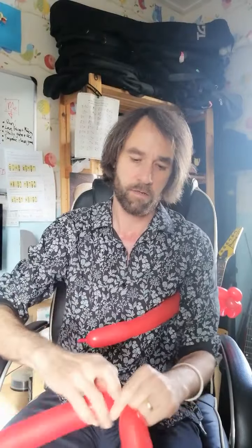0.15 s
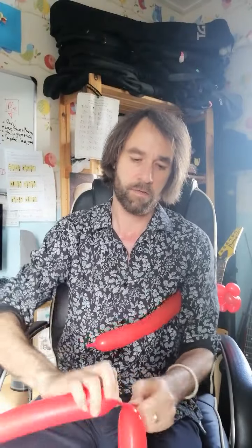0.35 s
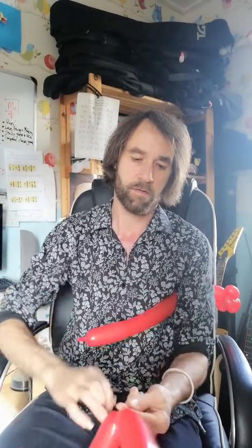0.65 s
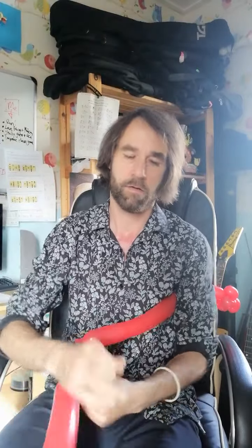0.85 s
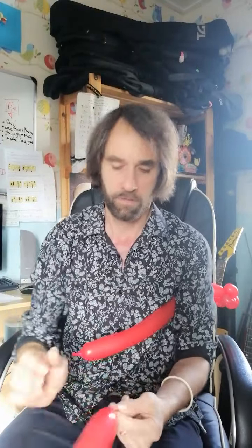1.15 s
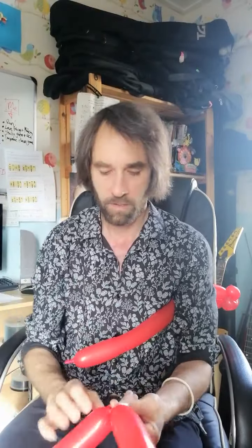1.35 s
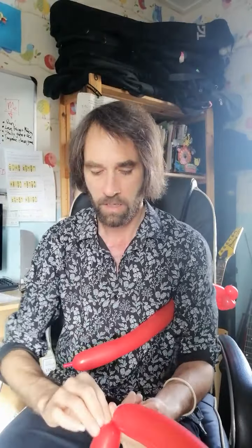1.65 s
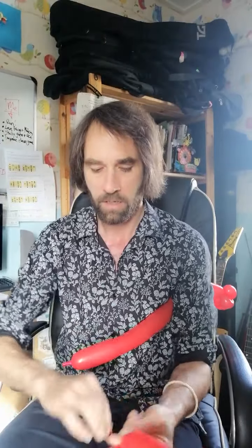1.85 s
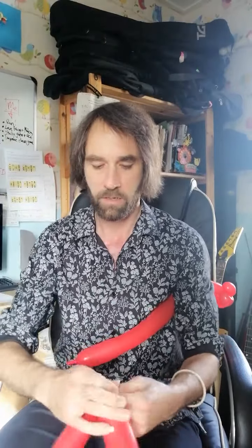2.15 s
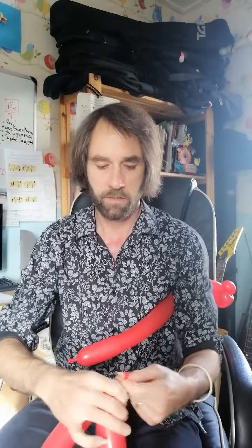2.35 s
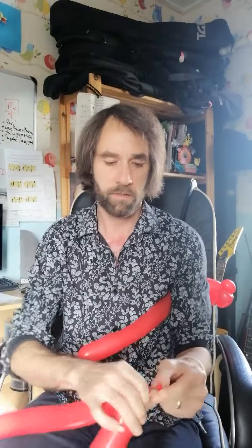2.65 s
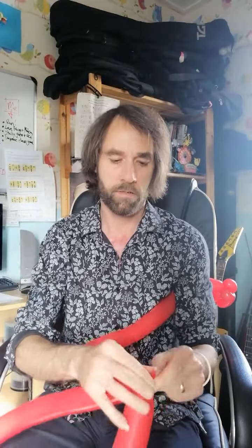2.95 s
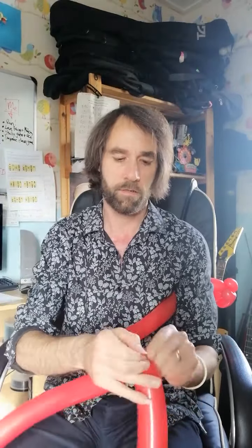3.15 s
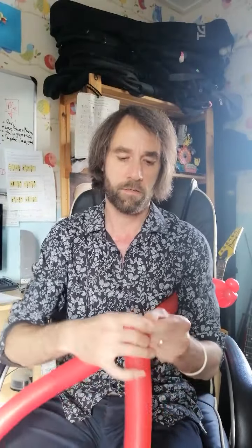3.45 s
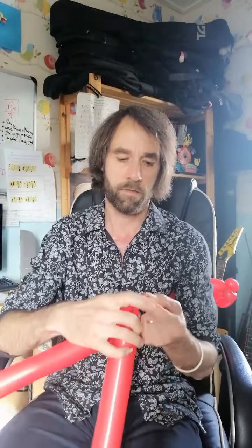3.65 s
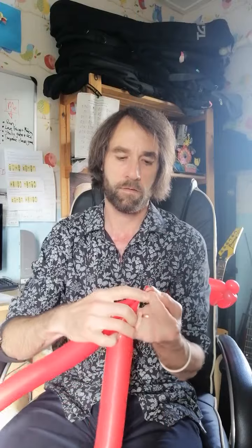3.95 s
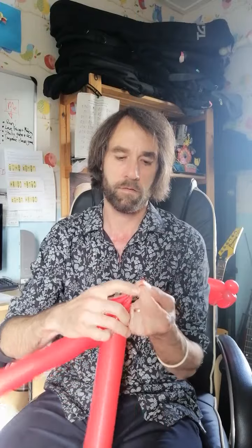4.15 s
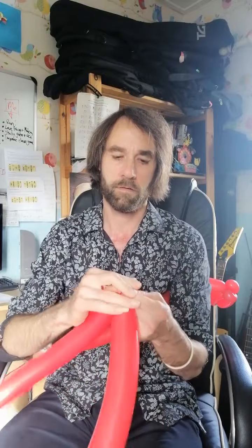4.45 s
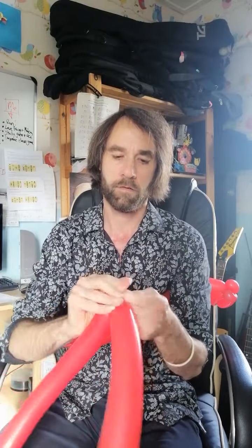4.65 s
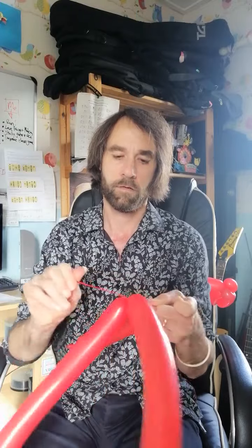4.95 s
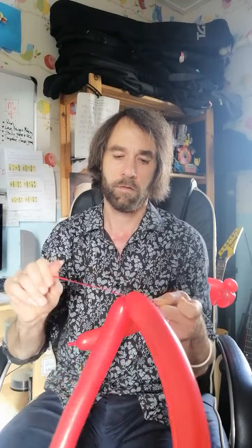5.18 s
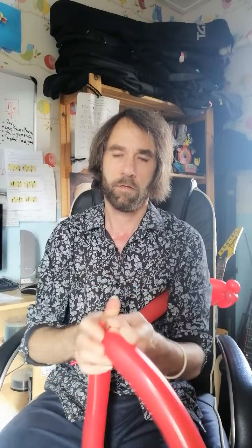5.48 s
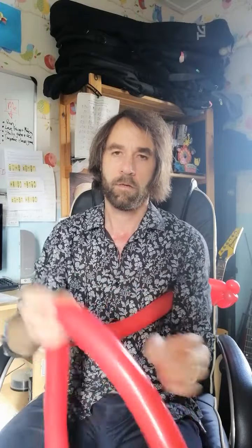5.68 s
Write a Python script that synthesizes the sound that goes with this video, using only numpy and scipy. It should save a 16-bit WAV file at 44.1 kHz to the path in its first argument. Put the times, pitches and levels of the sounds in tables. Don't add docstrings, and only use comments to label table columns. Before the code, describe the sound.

Sticky rubber catches and releases in irregular clicks, short crackling scrapes and very brief squeaks. Low tube thumps sit beneath some of them. Activity is dense at first, sparse from about 1.3 to 2.2 seconds, then lively again, ending with light touches. Close, dry, narrow-band mono sound with a short room tail and faint hush.

```python
import sys
import numpy as np
from scipy import signal
from scipy.fft import rfft, irfft
from scipy.io import wavfile
from scipy.ndimage import uniform_filter1d

SR = 44100
rng = np.random.default_rng(int(sys.argv[2]) if len(sys.argv) > 2 else 0)


def level_to_linear(level):
    exponent = np.asarray(level, float) / 20
    return 10 ** exponent


def persist_wave(psi):
    counts = np.round(np.clip(psi, -1, 1) * 32767).astype(np.int16)
    wavfile.write(sys.argv[1], SR, np.atleast_2d(counts).T)


N = 256662


def band(x, hz, width):
    return signal.lfilter(*signal.iirpeak(np.clip(hz, 20, 9000), hz / width, fs=SR), x)


def cut(x, lo_hz, hi_hz):
    return signal.sosfilt(signal.butter(2, [lo_hz, hi_hz], "band", fs=SR, output="sos"), x)


def peak(x, db):
    return x * level_to_linear(db) / np.sqrt(uniform_filter1d(x ** 2, size=176).max())


def unit(x):
    return x / np.sqrt(np.mean(x ** 2))


def add(out, x, s):
    i = int(s * SR)
    out[i:i + len(x)] += x[:len(out) - i]


def slips(size, per_s, spread_db):
    boost_db = np.minimum(spread_db * rng.exponential(size=size), 8)
    return (rng.random(size) < per_s / SR) * rng.standard_normal(size) * level_to_linear(boost_db)


def flurry(first):
    fade_ms = 8.5
    clicks = slips(4000, 2400, 4.0) * np.exp(-np.arange(4000) / SR * 1000 / fade_ms)
    clicks[0] = first
    return clicks


def skin(clicks, hz, width):
    return band(band(clicks, hz, width * hz), hz, 3.2 * hz)


def crack(clicks):
    return cut(cut(clicks, 3800, 7000), 3200, 8000)


def snaps():
    # start in seconds, level in dB, ring in Hz,
    # crack in dB against the ring.
    pops = [(.024, -16, 1200, -15), (0.264, -29, 716, -16.5), (.281, -46, 614, -2), (0.333, -25, 1320, -35),
            (.429, -19, 1700, -3.5), (.618, -28, 738, -2), (.737, -14, 1184, -31.5),
            (.89, -26.5, 1850, -38), (.937, -17.5, 560, -8), (1.096, -28, 950, -8), (1.122, -39, 970, 2),
            (1.191, -27, 980, -7.5), (1.37, -47, 1090, -7), (1.431, -48.5, 760, -38),
            (1.914, -34.5, 780, -49), (2.151, -49.5, 930, -7.5), (2.371, -39.5, 940, 2),
            (2.459, -38.5, 714, -17), (2.578, -64, 1780, 11), (2.721, -9, 813, -16.5),
            (2.728, -15, 1115, -25), (2.818, -47, 960, 4.5), (2.952, -34, 1320, -4.5),
            (3.184, -30.5, 1717, -5.5), (3.541, -10, 1700, -29), (3.548, -11, 1440, -7),
            (3.725, -28.5, 1420, -21), (4.643, -35.5, 1500, -10), (4.812, -28.5, 1100, -8.5),
            (5.693, -36, 821, -18)]
    # start in seconds, level in dB, ring in Hz, crack in dB against the ring.
    snicks = [(0.656, -39.5, 2390, -1.5), (0.7, -18, 2660, -13), (0.786, -29.5, 3540, -20),
              (.619, -25, 3600, -12.5), (1.48, -32.5, 3480, -33), (1.611, -46, 3100, -29),
              (1.702, -26.5, 3840, -35), (1.727, -50, 3300, 8), (1.974, -42, 2620, -24),
              (2.001, -26, 2480, 0.5), (2.236, -30, 2160, -12), (2.267, -26, 2460, 0),
              (2.354, -24, 2400, -5), (2.869, -22, 2190, -3.5), (3.011, -20, 2160, 0.2),
              (3.155, -12.5, 2240, -18), (3.839, -33.5, 2770, -1.5), (3.872, -28, 2150, -26),
              (4.077, -51, 2910, 0.5), (4.174, -40, 2480, -2), (4.187, -11.5, 2546, -11.5),
              (4.33, -35.5, 2350, -0.5), (4.444, -20, 2190, -46), (4.453, -21.5, 2120, -22),
              (4.549, -13, 2560, -9), (4.873, -22.5, 2320, -3), (4.984, -10.5, 2280, -13),
              (5.545, -55.5, 2130, 1.5), (5.584, -31.5, 2660, -6), (5.612, -22.5, 1960, -3)]
    tear, ring_width = 3.6, 0.35
    rows = []
    for s, db, hz, c in pops:
        rows.append((s, db, hz, db + 0.5 + 0.69 * c, 2250, db + c))
    for s, db, hz, c in snicks:
        slack_db = db - 8 - 2 * (hz / 1000 - 2.5)
        rows.append((s, slack_db, hz * 0.38, db, hz, db + c))
    out = np.zeros(N)
    for s, low_db, low_hz, high_db, high_hz, crack_db in rows:
        low = peak(skin(flurry(tear), low_hz, ring_width), low_db)
        high = peak(skin(flurry(-tear), high_hz, ring_width), high_db)
        add(out, low + high + peak(crack(flurry(tear)), crack_db), s)
    return out


def knocks():
    # start in seconds, peak in dB, air ring in Hz, bass in dB against the ring.
    firm = [(.023, -32, 415, 0), (0.26, -38.5, 308, 4.5), (0.442, -29, 458, -10), (.616, -30, 387, -7),
            (0.736, -16, 387, -6.5), (.797, -35, 440, 0), (.937, -17.5, 366, -10.5), (.949, -25, 365, -50),
            (1.095, -29, 380, -3.5), (1.197, -26, 206, 4.2), (1.219, -29.5, 405, 0),
            (2.236, -33.5, 430, -6.5), (2.385, -36.5, 351, -2), (2.723, -32, 382, -18.5),
            (2.867, -25.5, 490, -13), (2.933, -35, 355, -19.5), (3.009, -40.5, 462, -6.5),
            (3.153, -21, 368, -16.5), (3.197, -27.5, 336, -6.5), (3.295, -29, 296, 1.5),
            (3.541, -29, 389, -11), (3.567, -28, 340, -6.5), (3.93, -27.5, 336, -0.5), (4.365, -32, 350, 2),
            (4.42, -52.5, 229, -6), (4.548, -32.5, 366, -7.5), (4.642, -47, 571, -3.5),
            (4.982, -20, 512, -5), (5.585, -36, 290, -7), (5.808, -29.5, 324, -12)]
    # start in seconds, peak in dB,
    # bass in dB against the ring.
    taps = [(.238, -62, 16), (0.326, -42, -16), (0.402, -39.5, -2), (0.7, -37.5, -3), (1.039, -38, -21),
            (1.426, -52, -1.2), (1.479, -47.5, 1), (1.708, -48.5, -10), (1.912, -41, 4.5), (2.0, -37, -5.5),
            (2.15, -40.5, -8), (2.316, -56, -6), (2.457, -50.5, 10), (2.887, -32.5, -3), (3.476, -43, -28),
            (3.509, -42, -11), (3.649, -47.5, -4), (3.835, -54, -9.5), (3.869, -42.5, -5),
            (4.184, -41.5, -2.5), (4.327, -43, -2.5), (4.811, -43.5, -6.5), (4.87, -38.5, -5.5),
            (5.006, -31.5, -13), (5.564, -46, -12.5), (5.613, -42.5, -2), (5.657, -43, -4),
            (5.772, -50, -14)]
    tap_hz, push_ms, tear = 367, 12, 3.6
    out, t = np.zeros(N), np.arange(8000) / SR
    for s, db, hz, bass_db in list(firm) + [(s, db, tap_hz, bass) for s, db, bass in taps]:
        push = slips(len(t), 300, 16.0) * np.exp(-t * 1000 / push_ms)
        push[0] = tear
        ring = cut(cut(band(push, hz, 0.3 * hz), 150, 840), 72, 810)
        sway = cut(band(push, 145, 80), 47, 210)
        add(out, peak(ring, db) + peak(sway, db + bass_db), s)
    return out


def scrapes():
    # crest in seconds, level in dB, centre in Hz,
    # swell in ms, crack in dB.
    pulls = [(0.362, -37, 2520, 23, -31), (0.715, -30, 2360, 9.4, -17), (0.797, -34, 2550, 21, -28),
             (2.28, -36.5, 2310, 29, -22), (2.881, -22, 2150, 15, -22), (2.959, -32.5, 2500, 19, -34),
             (3.739, -36, 2720, 14, -19), (3.849, -43.5, 3540, 9.9, -21), (4.458, -54, 2240, 36, -2),
             (5.631, -38.5, 1730, 49, -10), (4.435, -45, 2100, 43, -23), (4.495, -53, 690, 12, -22.5)]
    # crest in seconds, level in dB, centre in Hz, fade in ms, crack in dB.
    slides = [(.039, -24, 1300, 8.4, -29.5), (0.062, -31, 3000, 17, -52.5), (.45, -27.5, 1670, 20, -45),
              (1.14, -46.5, 2000, 14, -15), (1.226, -35.5, 2100, 18, -11), (1.737, -42, 2500, 21, -28),
              (2.362, -33, 1900, 7, -17), (2.658, -66, 2800, 30, -5.5), (2.86, -38, 2570, 8.6, 1.5),
              (2.935, -30, 910, 5.1, -13), (3.17, -24, 2400, 13.1, -9), (3.203, -27, 2057, 32, -29.5),
              (3.263, -30, 1970, 23, -21.5), (3.489, -39.5, 2310, 9.6, -14.5),
              (3.517, -38.5, 2220, 8.3, -6), (3.562, -25.5, 1720, 16, -22), (4.09, -47, 3120, 15, -18.5),
              (4.351, -44.5, 2340, 24, -8.5), (5.77, -62.5, 2600, 13.8, 2)]
    rows = [(s, db, hz, ms, ms * 0.83, c) for s, db, hz, ms, c in pulls]
    rows += [(s, db, hz, ms * 0.97, ms, c) for s, db, hz, ms, c in slides]
    out, t = np.zeros(N), np.arange(-1500, 7000) / SR * 1000
    for s, db, hz, swell, fade, crack_db in rows:
        drag = np.where(t < 0, np.exp(-(t / max(swell, 2)) ** 2), np.exp(-t / max(fade, 2)))
        clicks = slips(len(t), 2300, 2.0) * drag
        add(out, peak(skin(clicks, hz, 0.82), db) + peak(crack(clicks), db + crack_db), s + t[0] / 1000)
    return out


def squeaks():
    # start in seconds, level in dB, click rate in Hz at the start, click rate in
    # Hz at the end, length in ms.
    trains = [
        (.3312, -24, 745, 676, 4),
        (1.7265, -32.5, 1660, 1630, 15),
        (1.75, -48.5, 1840, 1400, 26),
        (3.4795, -38, 410, 430, 11),
        (3.507, -28.5, 430, 430, 5.41),
        (1.049, -49, 3950, 3700, 7.9),
        (3.151, -21.5, 2257, 2066, 10.5),
        (3.17, -34, 2100, 2600, 19),
        (3.19, -30, 3048, 1700, 15),
        (.889, -36.5, 1500, 1600, 14),
    ]
    out, t = np.zeros(N), np.arange(3000) / SR
    for s, db, start_hz, end_hz, ms in trains:
        overtone = 2.6 if start_hz < 1850 else 1
        hz = (start_hz + end_hz) / 2 * overtone
        along = np.clip(t * 1000 / ms, 0, 1)
        wobble = 1 + 0.05 * unit(uniform_filter1d(rng.standard_normal(len(t)), size=30))
        turns = np.cumsum((start_hz + (end_hz - start_hz) * along) * wobble) / SR
        clicks = np.diff(np.floor(turns), prepend=-1) * (along < 1) * (.5 + np.sin(np.pi * along))
        add(out, peak(band(band(clicks, hz, 1.6 * hz), hz, .9 * hz), db), s)
    return out


def ticks():
    # start in seconds, peak in dB, ring in Hz.
    clean_slips = [(0.0279, -18, 2230), (0.0597, -23, 1850), (0.086, -32, 2070), (0.3657, -29, 2600),
                   (0.4615, -24, 1640), (0.619, -22, 3160), (0.7411, -20, 1340), (0.7479, -22, 1360),
                   (0.7902, -28, 3140), (0.8903, -28, 2940), (0.9031, -32, 1940), (0.9352, -29, 3260),
                   (0.9601, -31, 1950), (1.0982, -32, 1760), (1.2377, -32, 2330), (2.2385, -31, 2230),
                   (2.2654, -28, 4040), (2.2689, -26, 2830), (2.3735, -31, 2590), (2.7229, -18, 1400),
                   (2.8675, -21, 3890), (2.8984, -22, 2270), (2.9225, -30, 2160), (2.9541, -24, 2000),
                   (3.0256, -27, 2380), (3.2948, -32, 1920), (3.4791, -32, 1980), (3.5066, -26, 1830),
                   (3.5181, -30, 1950), (3.5442, -14, 1910), (3.875, -32, 2390), (3.8824, -33, 2090),
                   (4.2215, -28, 2290), (4.4338, -31, 2000), (4.4362, -33, 1930), (4.453, -18, 2140),
                   (4.4554, -20, 2480), (4.5505, -13, 2420), (4.5531, -13, 2780), (4.5752, -27, 2900),
                   (4.5899, -32, 3070), (4.8189, -33, 1750), (5.6155, -26, 2010), (5.6285, -27, 1950)]
    out, click = np.zeros(N), np.arange(600) == 0
    for s, db, hz in clean_slips:
        ring = skin(click, hz, .8)
        add(out, level_to_linear(db + 1) * ring / np.abs(ring).max(), s)
    return out


def rings():
    # crest in seconds, level in dB, pitch in Hz, length in ms.
    plain_notes = [(0.025, -34, 840, 10), (0.062, -38, 1378, 8), (0.072, -42, 2239, 14),
                   (0.446, -36, 1701, 21), (0.721, -40, 1873, 22), (0.739, -29, 1270, 8),
                   (0.759, -27, 452, 31), (1.224, -29, 151, 27), (1.264, -43, 108, 82),
                   (2.731, -25, 1077, 9), (2.731, -35, 388, 26), (2.732, -36, 2455, 15),
                   (2.878, -31, 2110, 25), (2.878, -34, 1077, 11), (2.89, -34, 538, 29),
                   (2.895, -36, 129, 13), (3.011, -40, 3768, 8), (3.155, -42, 5835, 36),
                   (3.16, -32, 3639, 9), (3.161, -35, 1270, 10), (3.174, -29, 2196, 23),
                   (3.187, -35, 3036, 9), (3.188, -29, 409, 42), (3.216, -36, 1680, 25),
                   (3.218, -38, 3187, 14), (3.222, -38, 2196, 39), (3.259, -36, 1701, 15),
                   (3.262, -39, 1227, 10), (3.265, -39, 2713, 13), (3.266, -41, 904, 18),
                   (3.509, -41, 409, 10), (3.558, -32, 840, 21), (3.559, -32, 151, 19),
                   (3.562, -28, 1701, 28), (3.585, -31, 366, 34), (3.933, -33, 151, 20), (4.19, -29, 883, 9),
                   (4.192, -30, 2778, 13), (4.2, -35, 1593, 20), (4.376, -33, 345, 16),
                   (4.457, -36, 2089, 15), (4.984, -30, 2821, 8), (4.984, -42, 5599, 7),
                   (4.985, -31, 151, 9), (4.989, -32, 2175, 16), (5.0, -37, 1464, 20), (5.004, -32, 711, 24),
                   (5.63, -41, 1680, 29)]
    # crest in seconds, level in dB, pitch in Hz, length in ms.
    further_notes = [(4.378, -32, 170, 24), (3.16, -24, 385, 16), (2.357, -38, 1650, 14),
                     (2.357, -38, 2450, 14), (3.546, -26, 1650, 10), (.79, -42, 5300, 14),
                     (.80, -42, 3300, 16), (.892, -38, 3150, 10), (.955, -42, 960, 60), (4.41, -46, 2100, 30),
                     (4.488, -42, 850, 10), (5.62, -40, 2300, 18), (5.71, -46, 820, 8), (3.483, -42, 420, 12),
                     (1.8, -63, 1550, 80), (5.015, -40, 1050, 40), (1.225, -35, 400, 20), (2.74, -46, 85, 50),
                     (.1, -50, 85, 50), (.91, -44, 500, 20), (5.78, -48, 370, 30), (.008, -44, 350, 14),
                     (2.39, -38, 330, 12), (1.13, -40, 120, 50)]
    sag, shake_depth, level_db = .03, .45, -2
    out, t = np.zeros(N + 3000), np.arange(-3000, 9000) / SR
    for s, db, hz, ms in list(plain_notes) + list(further_notes):
        fall = max(ms, 3) / 1000
        rise = min(fall * .35, .006)
        swell = np.exp(-(t / rise) ** 2)
        fade = np.exp(-(np.abs(t) / (fall * .75)) ** 1.5)
        shape = np.where(t < 0, swell, fade)
        shake = 1 + shake_depth * unit(band(rng.standard_normal(len(t)), hz / 14, hz / 10))
        turns = np.cumsum(hz * (1 - sag * np.tanh(t / fall))) / SR
        add(out, level_to_linear(db + level_db) * np.sqrt(2) * shape * shake * np.sin(2 * np.pi * turns), s)
    return out[3000:]


def twangs():
    # start in seconds, level in dB, partial in Hz, 60 dB decay in seconds, damped after seconds.
    plucks = [
        (3.012, -39, 937, .6, .15),
        (3.012, -47, 2019, .2, .14),
        (3.012, -53, 3930, .17, .12),
        (4.99, -41, 948, .6, .33),
        (5.0, -64, 463, 2.4, .46),
        (2.24, -56, 950, 1.2, .3),
        (1.73, -55, 1600, .35, .17),
        (1.73, -54, 3300, .28, .14),
        (1.73, -57, 4950, .15, .1),
    ]
    out, t = np.zeros(N), np.arange(SR) / SR
    for s, db, hz, t60, stop in plucks:
        fade = np.exp(-np.log(1000) * t / t60) * np.clip((stop - t) / 0.04, 0, 1)
        waver = 1 + min(hz / 5000, .7) * unit(band(rng.standard_normal(SR), hz / 30, hz / 25))
        add(out, level_to_linear(db) * fade * waver * np.sin(2 * np.pi * hz * t), s)
    return out


def rubbing():
    # crest in seconds, rustle in dB, hiss in dB and tube rumble in dB against the rustle.
    strokes = [(.01, -46, -3.7, 3), (.33, -43.5, -24, 9.5), (.44, -46, -1.5, 11), (.53, -47, -6.5, -3),
               (.68, -41, -4, -16), (.81, -47, -9, 5), (.92, -40.5, -9.5, -0.2), (1.08, -51.5, 0.5, 15),
               (1.16, -45.5, -5, 0), (1.3, -54.5, -6.5, 1), (1.52, -54.5, -6, -4), (1.72, -56, -20, -3),
               (1.92, -63.5, -29, 10.5), (2.11, -75, -3, 17), (2.33, -38, -22.5, 3.5),
               (2.62, -66, 4.5, -14.5), (2.77, -48, -24, -28.5), (2.9, -47.5, -6.5, 13),
               (2.98, -45.5, -18.5, 3), (3.13, -60, -4, -0.5), (3.26, -65.5, -17, 29.5),
               (3.55, -56.5, -18.5, -5.5), (3.74, -47, -5, -34.5), (3.92, -60.5, 0.5, 16),
               (4.3, -58.5, -4, -8), (4.41, -42, -3.5, -0.5), (4.5, -54.5, -17, -1.7), (4.8, -70, -2, -10),
               (4.845, -53, -3, -10), (4.36, -52, 2, -5), (4.165, -58, -3, -10), (.857, -56, 4, -10),
               (2.56, -66, 3, -10), (5.0, -50, -10.5, -4.3), (5.03, -59.5, -8.5, 17.5),
               (5.77, -47.5, -2.5, 3)]
    rise_db_s, fall_db_s = 298.5, 152
    clump_db, clump_ms = 2, 9
    s, db, hiss_db, rumble_db = np.transpose(strokes)[:, :, None]
    t = np.arange(0, N, 64) / SR
    drag_db = db - np.maximum((s - t) * rise_db_s, (t - s) * fall_db_s)
    clumps = uniform_filter1d(rng.standard_normal(len(t)), max(int(clump_ms * SR / 64000), 1))
    drag_db = drag_db + clump_db * unit(clumps)

    def loudness(offset_db):
        return np.interp(np.arange(N) / SR, t, level_to_linear(drag_db + offset_db).sum(axis=0))

    grain = unit(slips(N, 2500, 1.7)) + 0.97 * rng.standard_normal(N)
    rumble = band(rng.standard_normal(N), 84, 32) + level_to_linear(-5.5) * band(grain, 360, 140)
    rustle = loudness(0) * unit(cut(grain, 690, 3400))
    hiss = loudness(hiss_db) * unit(cut(grain, 2100, 10000))
    return rustle + hiss + loudness(rumble_db) * unit(cut(rumble, 42, 750))


def room(x):
    # band centre in Hz, 60 dB decay in seconds.
    decays = [(100, 0.19), (300, 0.087), (800, 0.17), (2000, 0.032), (4000, 0.11), (7000, 0.12)]
    t, out = np.arange(SR // 2) / SR, x
    place = np.arange(N) * 5 // SR % 3
    for k in range(3):
        echoes = rng.standard_normal(len(t)) * (rng.random(len(t)) < .015 + 8 * t) * (t > .002)
        tail = sum(band(echoes, hz, 2.5 * hz) * np.exp(-np.log(1000) * t / t60) for hz, t60 in decays)
        tail = tail / np.sqrt(np.sum(tail ** 2))
        out = out + level_to_linear(-7) * signal.fftconvolve(x * (place == k), tail)[:N]
    return out


def air():
    # frequency in Hz, density in dB per Hz.
    hush = [(15, -35), (25, -13), (136, -4.5), (204, -3.5), (428, -12.5), (460, -0.5), (506, -15.5),
            (1310, -13.5), (7500, -42), (9750, -58), (16500, -120)]
    hz, db = np.transpose(hush)
    f = np.arange(1, N // 2 + 2) * SR / N
    colour = level_to_linear(np.interp(np.log(f), np.log(hz), db))
    return level_to_linear(-68.5) * unit(irfft(rfft(rng.standard_normal(N)) * colour, N))


def scene():
    # centre in Hz, width in Hz, level in dB.
    body = [(790, 180, 6), (1300, 870, 2), (1700, 34, 0.5), (2280, 28, -12), (2800, 600, -3),
            (3620, 560, 0)]
    slip = level_to_linear(-8.0) * snaps() + scrapes() + squeaks()
    slip = slip + level_to_linear(-6) * sum(level_to_linear(db) * band(slip, hz, w) for hz, w, db in body)
    in_room = room(slip + level_to_linear(1.0) * knocks() + ticks())
    return (in_room + rubbing() + twangs() + air() + rings())[None]


def hollows(x):
    # start in seconds, end in seconds, lowest empty band in Hz.
    gaps = [(.338, .356, 4350), (.795, .814, 4200), (.88, .91, 2650), (.88, .906, 4150),
            (2.13, 2.146, 2200), (4.853, 4.862, 4600), (1.041, 1.073, 1400), (1.937, 1.96, 4400),
            (1.937, 1.96, 5200), (3.687, 3.71, 4600)]
    step, width = 1.45, .17
    t = np.arange(N) / SR
    for t0, t1, lowest_hz in gaps:
        gate = np.clip(np.minimum(t - t0, t1 - t) / 0.0066 + .5, 0, 1)
        near = slice(int(t0 * SR) - 2000, int(t1 * SR) + 2000)
        for hz in lowest_hz * step ** np.arange(3):
            edges = hz * (1 + width * np.array([-.5, .5]))
            lost = signal.sosfiltfilt(signal.butter(4, edges, "band", fs=SR, output="sos"), x[near])
            x = x - .94 * gate * np.pad(lost, (near.start, N - near.stop))
    return x


def band_limit(x):
    return signal.sosfilt(signal.butter(12, 8400, fs=SR, output="sos"), x)


def record(dry):
    top_hz, sway_db, hiss_db = 7250, -74, -87.5
    x = signal.sosfilt(signal.butter(2, 75, "high", fs=SR, output="sos"), dry)
    x = x + level_to_linear(sway_db) * unit(cut(rng.standard_normal(N), 15, 44))
    x = hollows(x[0])[None]
    x = signal.sosfilt(signal.cheby1(14, .5, top_hz, fs=SR, output="sos"), x)
    x = 1.022 * np.tanh(x / 1.503) + level_to_linear(hiss_db) * rng.standard_normal(x.shape)
    x = x * np.clip((N - np.arange(N)) / 200, 0, 1)
    return band_limit(x)


dry = scene()
out = record(dry)
persist_wave(out)
```